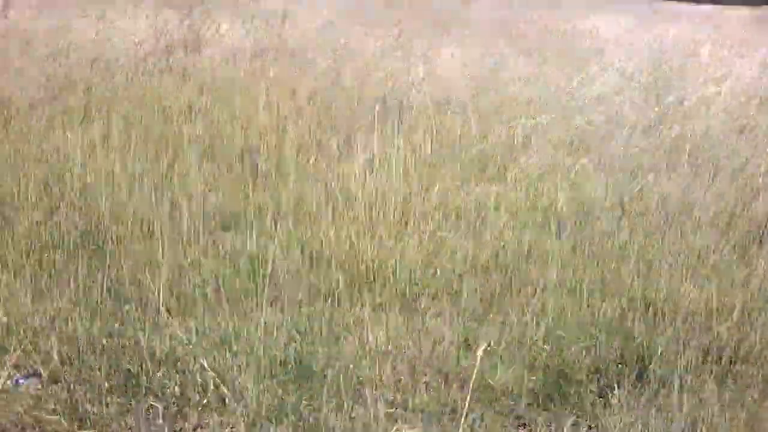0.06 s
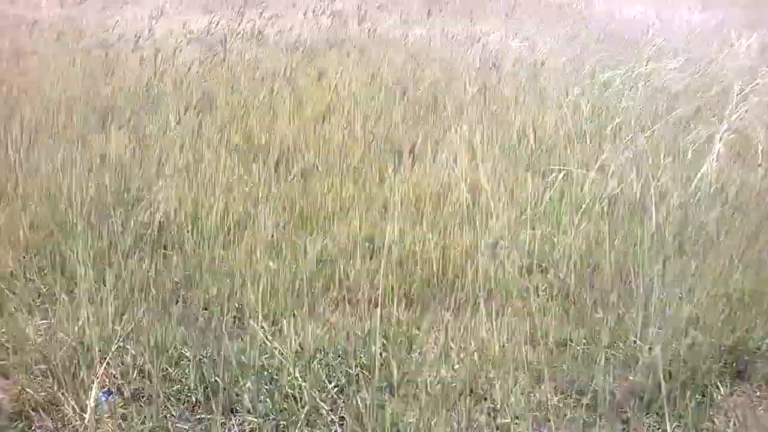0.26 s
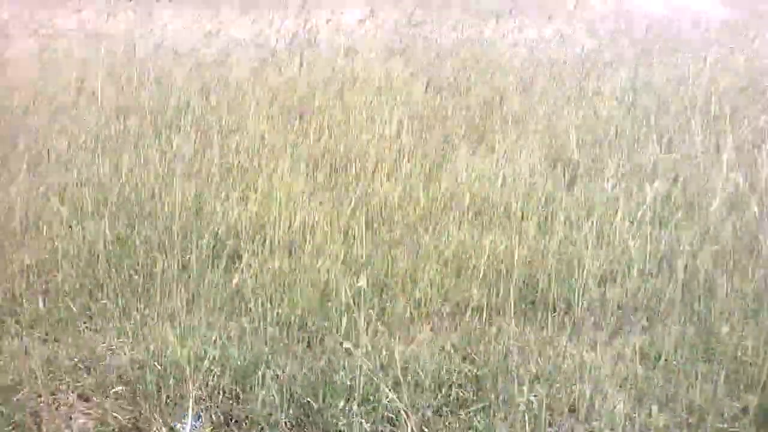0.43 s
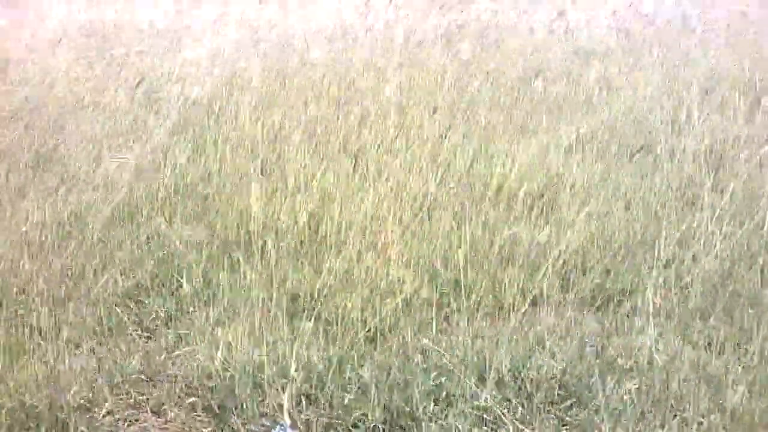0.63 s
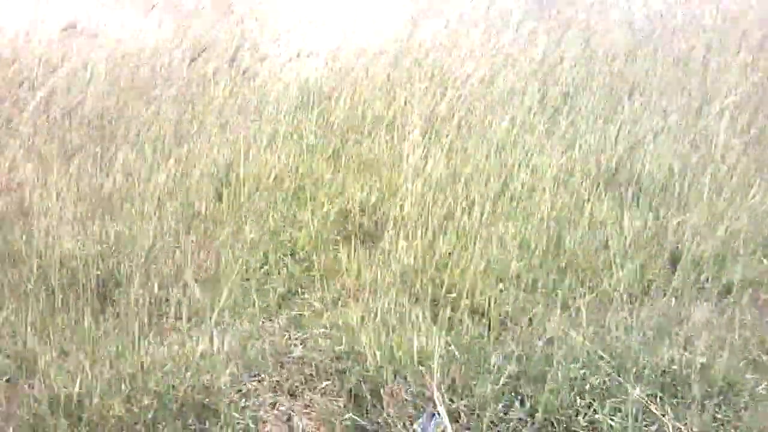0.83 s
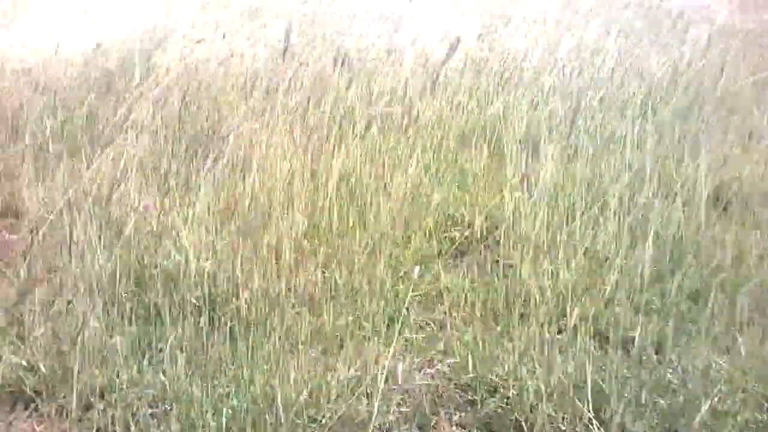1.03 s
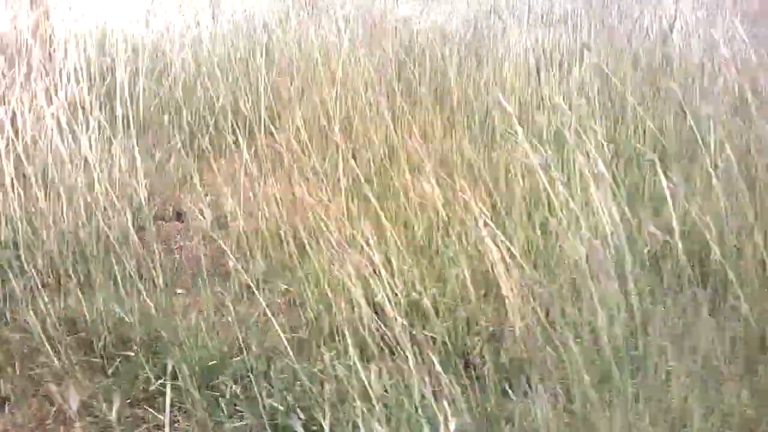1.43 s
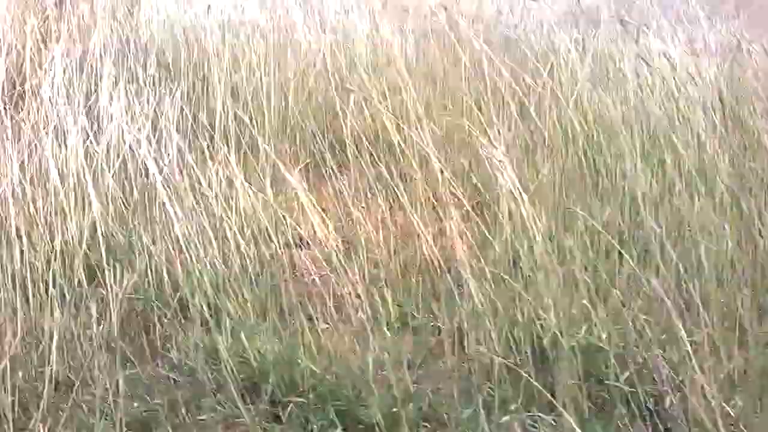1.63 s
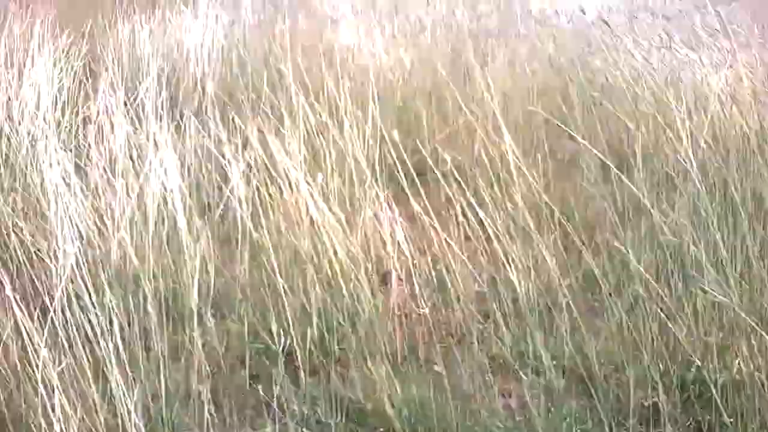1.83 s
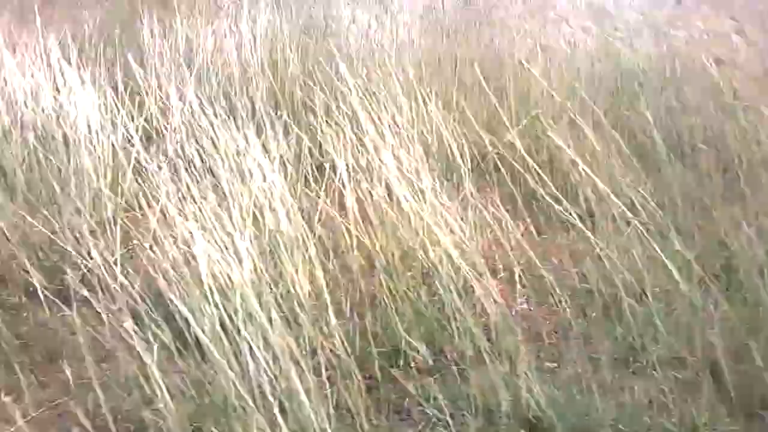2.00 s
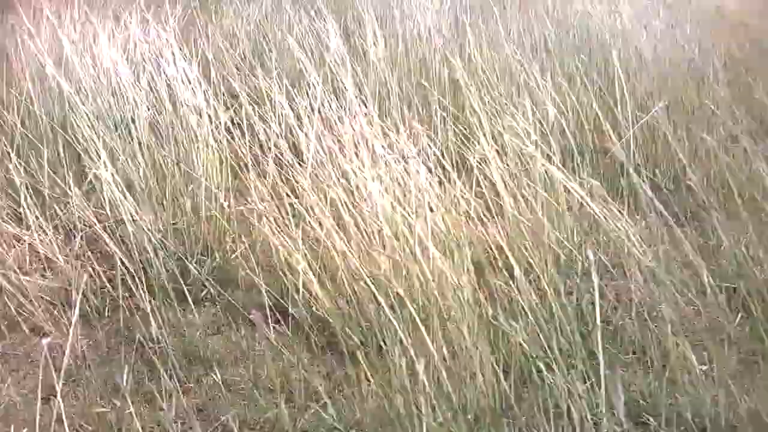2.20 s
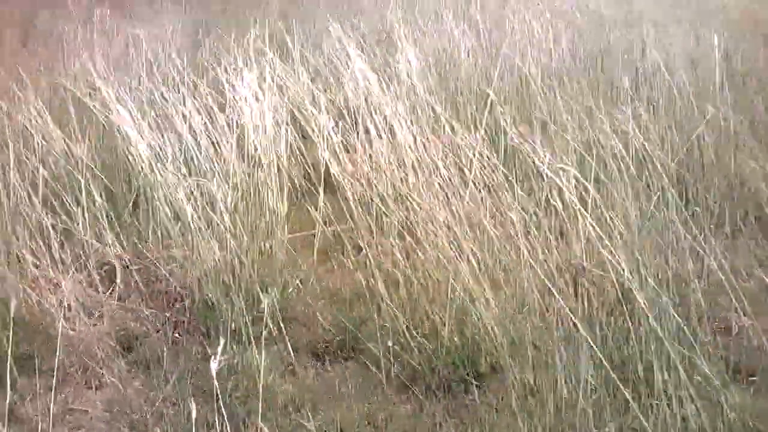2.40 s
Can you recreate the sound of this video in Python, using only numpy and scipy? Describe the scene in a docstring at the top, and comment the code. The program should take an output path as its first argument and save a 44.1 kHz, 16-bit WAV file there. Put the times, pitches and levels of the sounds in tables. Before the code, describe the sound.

Wind rumbles and thumps on the microphone over a soft hiss of dry grass, with brief swishes. Around 0.7 seconds a faint airy tone glides downward. At about 1 second a gust rushes in, bringing heavier rumble, sharp thumps, flutters and crackle until 2.3 seconds, then easing. Nearby stalks rustle while the distant hiss fades, and a very faint high insect trill runs from 1.4 seconds on.

```python
"""Wind blows over a field of tall dry grass. From the start the field hisses, nearby stalks tick and swish,
and eddies rumble and thump on the microphone. An airy tone soon glides down through the hiss.
After a second a gust builds and rushes through the grass: the rumble turns lumpy, with sharp thumps,
short flutters and crackle. An insect then trills faintly while the far hiss fades."""
import sys
import numpy as np
from scipy import signal
from scipy.io import wavfile

SR = 44100
rng = np.random.default_rng(int(sys.argv[2]) if len(sys.argv) > 2 else 0)


def int16_out(signal):
    """Quantize to a 16-bit WAV file."""
    q = np.round(np.clip(np.atleast_2d(signal).T, -1, 1) * 32767)
    wavfile.write(sys.argv[1], SR, q.astype(np.int16))


N = 112454
TIME = np.arange(N) / SR


def from_db(db):
    """Amplitude grows tenfold with every 20 dB."""
    return 10 ** (np.asarray(db) / 20)


def rms_one(x):
    """Normalisation: scale a signal to unit rms."""
    return x / np.sqrt(np.mean(x ** 2) + 1e-20)


def level(rows):
    """Amplitude envelope, linear in dB between points. Each row: time in seconds, level in dB."""
    return from_db(np.interp(TIME, *np.transpose(rows)))


def swells(rows):
    """Sum of Gaussian envelopes. Each row: middle in seconds, level in dB, half-length in seconds."""
    return sum(from_db(db) * np.exp(-.5 * ((TIME - s) / half) ** 2) for s, db, half in rows)


def drift(rate_hz):
    """Random modulation: white noise smoothed by a two-pole low-pass, with rms near 1."""
    step, settle = 20, 2000  # one value per 20 samples; the first 2000 let the filter settle
    pole = np.exp(-2 * np.pi * step * rate_hz / SR)
    white = rng.standard_normal(N // step + settle + 2)
    slow = signal.lfilter([1], [1, -2 * pole, pole * pole], white)[settle:]
    return np.interp(np.arange(N) / step, np.arange(len(slow)), rms_one(slow))


def banded_noise(spectrum, flicker_db, flicker_hz, bands):
    """Spectral shaping: adjacent noise bands follow a spectrum, each flickering on its own; rms 1."""
    hz, db = np.transpose(spectrum)
    edges = np.geomspace(max(hz[0], 12), min(hz[-1], .45 * SR), bands + 1)
    out = 0
    for low, high in zip(edges, edges[1:]):
        white = rng.standard_normal(N + SR // 4)
        band_pass = signal.butter(2, [low, high], "band", fs=SR, output="sos").repeat(2, axis=0)
        band = signal.sosfilt(band_pass, white)[-N:]
        band_db = np.interp(np.log(low * high) / 2, np.log(hz), db)
        out = out + band * from_db(band_db + flicker_db * drift(flicker_hz))
    return rms_one(out)


def airy_tone(hz, width_hz):
    """Narrow-band noise: sine and cosine of a steady or gliding pitch, each randomly modulated."""
    phase = 2 * np.pi * np.cumsum(hz * np.ones(N)) / SR
    return drift(width_hz) * np.sin(phase) + drift(width_hz) * np.cos(phase)


def eddy(t, width_s):
    """A passing vortex makes a pressure pulse: a spike between two shallow troughs."""
    tightness = 1.396  # higher: deeper, shorter troughs
    distance_sq = (t / width_s) ** 2
    return (1 - distance_sq) / (1 + distance_sq / (2 * tightness - 1)) ** (tightness + 1)


def eddy_stream(per_s, width_s, width_spread, spread_db):
    """Turbulence as a Poisson process: eddies of random size and strength arrive by chance; rms 1."""
    out, reach, widths = np.zeros(N), SR // 40, width_s * np.ones(N)
    arrivals = np.flatnonzero(rng.random(N) < per_s / SR)
    size, strength = np.clip(rng.standard_normal((2, N)), -1.5, 1.5)
    for i in arrivals:
        near = slice(max(i - reach, 0), i + reach)
        width = widths[i] * np.exp(width_spread * size[i])
        out[near] += from_db(spread_db * strength[i]) * eddy(TIME[near] - TIME[i], width)
    return rms_one(out)


def rumble():
    """Turbulent pressure on the microphone: stronger wind sweeps eddies past faster, in shorter pulses."""
    # Wind pressure. Each row: time in seconds, level in dB.
    wind_levels = [(0, -44), (.05, -41.5), (.17, -39), (.21, -34.5), (.25, -35), (.29, -44.5), (.33, -27),
                   (.365, -29), (.39, -32), (.42, -28.5), (.49, -25.5), (.525, -36), (.57, -23.5),
                   (.63, -42.5), (.66, -42), (.69, -52), (.71, -36.5), (.745, -30), (.785, -40.5),
                   (.82, -28.5), (.87, -35.5), (.91, -28), (.945, -33), (.99, -26.5), (1.025, -31.5),
                   (1.07, -11), (1.1, -22), (1.16, -16), (1.19, -21.5), (1.24, -20), (1.34, -26),
                   (1.41, -18.5), (1.55, -26.5), (1.62, -42), (1.68, -18), (1.77, -29.5), (1.9, -27.5),
                   (2.005, -27.5), (2.03, -41.5), (2.06, -21), (2.19, -30.5), (2.26, -26.5), (2.31, -41.5),
                   (2.38, -38.5), (2.55, -34)]
    # Large, slow turbulence. Each row: frequency in Hz, relative spectral density in dB.
    rumble_spectrum = [(20, -1), (40, 3), (72, 1), (130, -6), (200, -13.5), (300, -26), (500, -28.5),
                       (900, -53)]
    wind_db = np.interp(TIME, *np.transpose(wind_levels))
    db_per_halving = 34  # the rise in wind that halves the pulse width
    width_s = .0022 * 2 ** ((wind_db.mean() - wind_db) / db_per_halving)
    slow = from_db(1.5) * banded_noise(rumble_spectrum, flicker_db=2, flicker_hz=9.7, bands=11)
    eddies = from_db(-2) * eddy_stream(per_s=110, width_s=width_s, width_spread=.33, spread_db=5.5)
    return from_db(wind_db) * (slow + eddies)


def field_hiss():
    """Incoherent summation: the countless stalks of the whole field merge into a smooth hiss."""
    # The far hiss. Each row: frequency in Hz, relative spectral density in dB.
    field_spectrum = [(250, 10), (500, -1.5), (720, 1.5), (980, 5), (1400, -1), (2000, -3.5), (2800, -5),
                      (4100, -3), (5000, -10), (6000, -19.5), (7000, -16.5), (8500, -48), (12000, -39),
                      (16000, -32)]
    # Its envelope. Each row: time in seconds, level in dB.
    field_levels = [(0, -51.5), (.35, -51.5), (.7, -50.5), (1.0, -51.5), (1.3, -55), (1.5, -56),
                    (2.0, -60.5), (2.22, -64), (2.55, -70)]
    return level(field_levels) * banded_noise(field_spectrum, flicker_db=1.3, flicker_hz=8.6, bands=32)


def stand_rustle():
    """Amplitude modulation: the rustle of nearby grass, bent by the gust, varies as the stalks sway."""
    # The near rustle. Each row: frequency in Hz, relative spectral density in dB.
    stand_spectrum = [(400, -3), (1000, 0.5), (1900, -1.5), (2800, -9), (4200, -12), (5900, -21),
                      (7200, -13.5), (9500, -22), (11500, -30.5), (16000, -37.5)]
    # Its envelope. Each row: time in seconds, level in dB.
    stand_levels = [(0, -66), (.8, -62), (1.0, -54), (1.14, -50), (1.22, -58.5), (1.33, -57.5),
                    (1.55, -57.5), (1.8, -54.5), (1.96, -54.5), (2.03, -56.5), (2.16, -52), (2.2, -59.5),
                    (2.33, -57), (2.42, -57), (2.55, -56)]
    rustle = banded_noise(stand_spectrum, flicker_db=1.5, flicker_hz=13, bands=28)
    sway = from_db(1.1 * drift(rate_hz=7.3))
    return level(stand_levels) * sway * rustle


def ticks():
    """Impulsive excitation: a stalk flicks, giving a noise burst that decays exponentially."""
    # Stalk flicks. Each row: start in seconds, level in dB.
    flicks = [(0.02, -51), (1.158, -44.5), (2.089, -61)]
    # Their colour. Each row: frequency in Hz, relative spectral density in dB.
    tick_spectrum = [(1800, 6.5), (3200, -2), (4600, 5.5), (6000, -6.5), (7800, 1), (9500, 0), (11500, -21),
                     (13000, -22)]
    attack_s, decay_s = .0005, .004
    envelope = 0
    for start, db in flicks:
        age = np.maximum(TIME - start, 0)
        envelope += from_db(db) * np.minimum(age / attack_s, 1) * np.exp(-age / decay_s)
    return envelope * banded_noise(tick_spectrum, flicker_db=1.2, flicker_hz=36, bands=12)


def swishes():
    """Friction noise: grainy swishes of dry grass, each with its top treble cut steeply by a low-pass."""
    # Swishes. Each row: middle in seconds, level in dB, half-length in seconds,
    # spectral tilt in dB per octave, cutoff of the low-pass filter in Hz.
    swish_swells = [(0.034, -64, 0.022, 8, 9900), (0.37, -52, 0.015, -1.5, 12000),
                    (0.391, -55, 0.03, 1.5, 20000), (0.703, -59.5, 0.029, 0, 10500),
                    (0.903, -59.5, 0.012, 0, 9000), (1.05, -60.5, 0.023, 13, 12000),
                    (1.125, -59.5, 0.031, 14, 12300), (1.346, -58, .016, 3, 10200),
                    (2.154, -56, 0.01, -2, 8500), (2.414, -65, 0.048, 4.5, 10000)]
    # Their common colour. Each row: frequency in Hz, relative spectral density in dB.
    swish_spectrum = [(1500, 11), (2400, 5), (3500, -6.5), (5200, 0.5), (6200, -8), (8000, -8),
                      (10500, -13.5), (13000, -20.5), (16000, -20)]
    hz, common_db = np.transpose(swish_spectrum)
    pivot_hz = 5000
    out = 0
    for middle, db, half, tilt, cutoff_hz in swish_swells:
        tilt_db = tilt * np.log2(hz / pivot_hz)
        low_pass_db = -10 * np.log10(1 + (hz / cutoff_hz) ** 20)
        colour = np.column_stack([hz, common_db + tilt_db + low_pass_db])
        grain = from_db(drift(rate_hz=250))  # 1 dB rms
        filtered_noise = banded_noise(colour, flicker_db=1.2, flicker_hz=55, bands=12)
        out += swells([(middle, db, half)]) * grain * filtered_noise
    return out


def thumps():
    """Pressure transients: single strong vortices strike the microphone."""
    # Strong eddies. Each row: time in seconds, peak in dB, half-width in milliseconds.
    strong_eddies = [(0.197, -15, 3.55), (0.368, -19.5, 1.26), (0.427, -16, 2.5), (0.486, -22.5, 0.85),
                     (0.555, -14, 0.98), (0.578, -15, 1.02), (0.627, -11, 3.1), (0.848, -13.5, 1.06),
                     (0.98, -13, 1.6), (1.05, -15.5, 0.61), (1.063, -4.5, 4), (1.081, -16.5, 0.52),
                     (1.134, -17, 0.64), (1.156, -4.5, 1.97), (1.202, -7.5, 0.87), (1.221, -4, 1.3),
                     (1.24, -9.5, 7.3), (1.272, -14, 0.49), (1.293, -7, 1.5), (1.375, -13, 0.66),
                     (1.382, -9.5, 1.16), (1.424, -14.5, 0.97), (1.445, -11, 3.4), (1.461, 0, 1.0),
                     (1.479, -10.5, 1.7), (1.597, -23, 1.16), (1.688, -9.5, 0.81), (1.703, -8.5, 0.8),
                     (1.73, -14.5, 0.89), (1.741, -16.5, 0.78), (1.801, -2, 1.24), (1.818, -7, 0.66),
                     (1.845, -11, 3.8), (1.93, -18, 1.3), (1.984, -8.5, 2.35), (2.063, -6.5, 1.02),
                     (2.144, -12.5, 1.08), (2.221, -4.5, 0.75), (2.228, -2.5, 1.08), (2.453, -15.5, 1.57)]
    return sum(from_db(db) * eddy(TIME - s, ms / 1000) for s, db, ms in strong_eddies)


def flutters():
    """Turbulent breakup: the airflow splits into short bursts of small eddies."""
    # Flutters. Each row: middle in seconds, level in dB, half-length in seconds.
    breakups = [(.583, -24.5, 0.0055), (.614, -40, 0.01), (1.135, -33, 0.01), (1.206, -17, .005),
                (1.225, -23.5, 0.0052), (1.272, -28.5, 0.023), (1.325, -39.5, 0.0088),
                (1.38, -17.5, 0.0046), (1.463, -23, 0.0081), (1.66, -23.5, 0.01), (1.706, -21, 0.011),
                (2.11, -36, 0.025), (2.224, -24, 0.0071), (2.535, -38.5, 0.028)]
    return swells(breakups) * eddy_stream(per_s=670, width_s=.0009, width_spread=.35, spread_db=6)


def whistle():
    """An exponential glide: an airy tone swells as it falls through the hiss, then fades."""
    # The tone's envelope. Each row: time in seconds, level in dB.
    whistle_levels = [(.605, -90), (.635, -64.5), (.66, -73), (.71, -56), (.73, -61.5), (.81, -60.5),
                      (.86, -75), (.9, -120)]
    start_s, glide_s, start_hz, octaves_per_s = .6, .26, 7800, 8.1
    age = np.clip(TIME - start_s, 0, glide_s)
    pitch_hz = start_hz * 2 ** (-octaves_per_s * age)
    return level(whistle_levels) * airy_tone(pitch_hz, width_hz=300)


def gust_rush():
    """Flow noise: the gust passes through the grass in one broad midrange swell."""
    # The gust. Each row: middle in seconds, level in dB, half-length in seconds.
    gust_swell = [(1.2, -51, 0.2)]
    # Its colour. Each row: frequency in Hz, relative spectral density in dB.
    rush_spectrum = [(500, -0.5), (1200, 1), (2100, 1), (3000, -9.5), (4500, -24.5)]
    return swells(gust_swell) * banded_noise(rush_spectrum, flicker_db=1.5, flicker_hz=15, bands=10)


def crackle():
    """Shorter pulses reach higher frequencies: the finest eddies of the roughest air crackle."""
    # Rough air. Each row: middle in seconds, level in dB, half-length in seconds.
    rough_spells = [(1.272, -41.5, .007), (1.378, -38.5, 0.0053), (1.464, -43, .004), (1.706, -33, 0.0074)]
    return swells(rough_spells) * eddy_stream(per_s=1000, width_s=.00036, width_spread=.3, spread_db=4)


def insect():
    """Stridulation: each wing stroke gives one pulse of a faint, high trill."""
    # The trill's envelope. Each row: time in seconds, level in dB.
    trill_levels = [(1.25, -100), (1.36, -78), (1.7, -76.5), (2.15, -79), (2.25, -88), (2.4, -77),
                    (2.55, -77)]
    strokes_per_s, stroke_at_s = 31.1, 1.402
    strokes = np.cos(np.pi * strokes_per_s * (TIME - stroke_at_s)) ** 4
    return level(trill_levels) * strokes * airy_tone(hz=9950, width_hz=180)


def scene():
    """Superposition: the pressures of wind, grass, airy tone and insect add in one channel."""
    wind = gust_rush() + rumble() + thumps() + flutters() + crackle()
    grass = field_hiss() + stand_rustle() + ticks() + swishes()
    return (wind + grass + whistle() + insect())[None]


def record(dry):
    """Band limiting and saturation: the deepest bass and top treble are lost, hard thumps are rounded."""
    low_cut_hz, overload_peak, high_cut_hz = 17, .6, 15800
    microphone = signal.butter(1, low_cut_hz, "high", fs=SR, output="sos")
    recorder = signal.ellip(10, .3, 70, high_cut_hz, fs=SR, output="sos")
    pressure = signal.sosfilt(microphone, dry)
    rounded = pressure / (1 + (pressure / overload_peak) ** 4) ** .25
    return signal.sosfilt(recorder, rounded)


dry = scene()
out = record(dry)
int16_out(out)
```